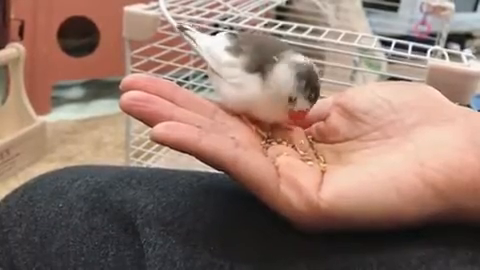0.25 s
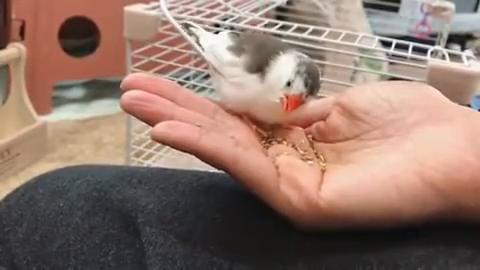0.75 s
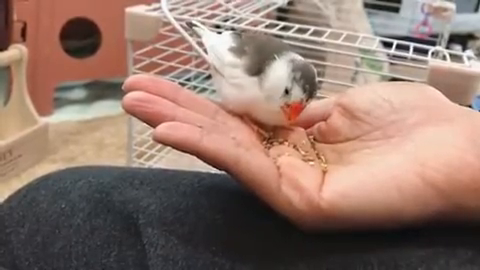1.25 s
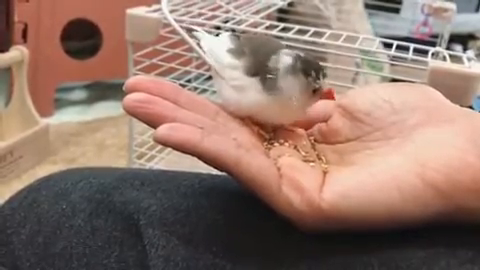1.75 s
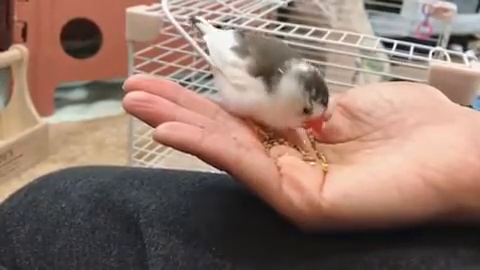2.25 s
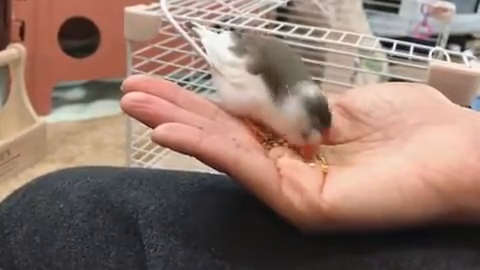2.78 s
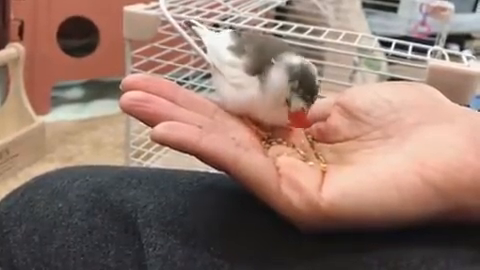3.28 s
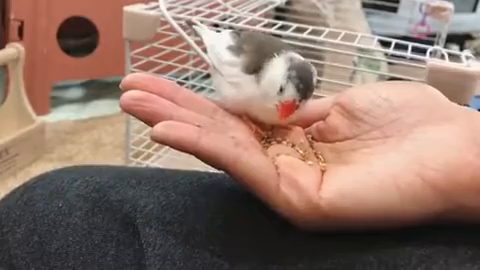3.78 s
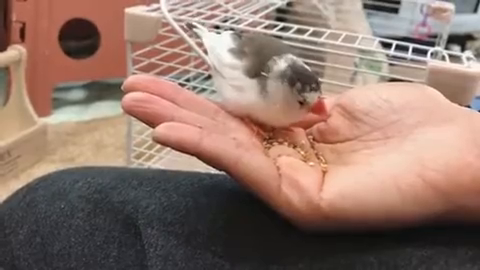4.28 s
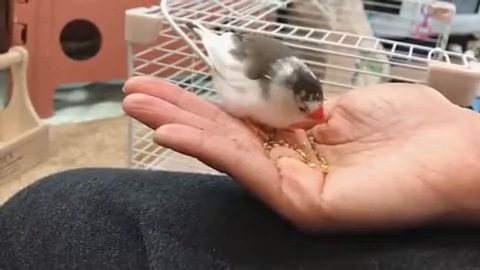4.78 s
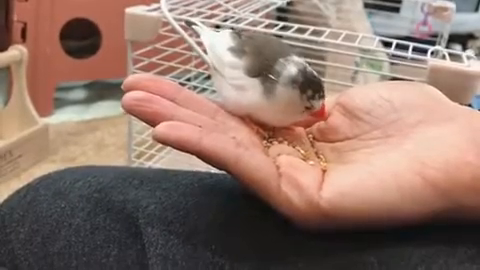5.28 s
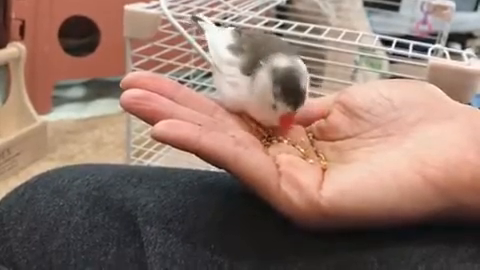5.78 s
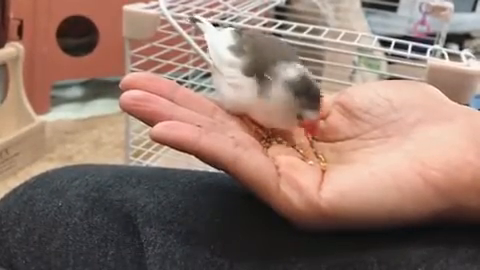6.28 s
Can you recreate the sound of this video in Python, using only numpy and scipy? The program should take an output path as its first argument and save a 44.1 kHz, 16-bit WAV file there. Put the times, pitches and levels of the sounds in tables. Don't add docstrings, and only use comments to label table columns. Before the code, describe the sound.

A quiet indoor room holds a low mains-like hum, soft air noise and a faint, irregular fan rattle throughout. Close to the phone, a small finch feeds with tiny dry rustles and a very soft nasal peep at 0.6 s, followed by a faint husk tick. From 1.3 to 1.95 s a bird across the room gives six sharp gliding chirps, roughly nine per second, each a quick sweep or leap, blurred by wall reflections. One lone chirp comes at 2.7 s. Small rustles continue around 3 s. At 3.7 to 4.0 s there is a tight cluster of chirps, with a faint near peep just before. A crisp husk snap lands at 4.1 s, another at 4.5 s, then more rustling. A barely audible falling chirp passes at 5.1 s, a soft nasal call at 5.65 s, and a low-to-rising chirp with a strong held end at 5.8 s. Rustles and rattle finish by 6.5 s.

```python
import sys
import numpy as np
from scipy import signal
from scipy.fft import rfft, irfft, next_fast_len
from scipy.io import wavfile
from scipy.ndimage import uniform_filter1d

SR = 44100
rng = np.random.default_rng(int(sys.argv[2]) if len(sys.argv) > 2 else 0)


def int16_out(signal):
    q = np.round(np.clip(np.atleast_2d(signal).T, -1, 1) * 32767)
    wavfile.write(sys.argv[1], SR, q.astype(np.int16))


def natural_amplitude(level_db):
    exponent = np.asarray(level_db, float) / 20
    return 10 ** exponent


N = 287973

# freq_hz, density_db
HUM_SPECTRUM = [(20, -31), (45, -1), (70, 2.5), (175, -9.5), (295, -9.5), (450, -15.5), (800, -20),
                (1100, -17.5), (1900, -16), (3000, -24.5), (6000, -29), (7200, -35.5), (11700, -34),
                (14200, -35.5)]
# freq_hz, width_hz, level_db
HOUSING_MODES = [(1068, 71, -6), (1680, 32, 2), (1914, 57, 4), (2206, 6.2, 2), (2576, 37, -2.5),
                 (3190, 124, -9), (3670, 53, -21), (4100, 100, -14.5)]
# start_s, peak_db
FAN_KNOCKS = [(0.024, -49), (0.0638, -51), (0.3067, -53.5), (0.5127, -52.5), (0.9654, -55), (1.021, -49.5),
              (1.172, -48), (2.0771, -51), (2.1912, -50), (2.5253, -53), (2.5914, -56), (2.645, -49),
              (2.7766, -49.5), (3.0044, -51.5), (3.175, -51.5), (3.2101, -49), (3.252, -52.5),
              (3.3772, -59), (3.5543, -49.5), (3.6644, -51.5), (4.249, -49.5), (4.3066, -52.5),
              (4.4027, -54), (4.7604, -50.5), (4.8155, -57), (5.2634, -54), (5.4232, -52.5),
              (5.9468, -48.5), (6.2898, -47.5), (6.327, -47)]
# start_s, peak_db, ring_hz
HUSK_SNAPS = [
    (0.6544, -53, 3200),
    (4.0735, -35, 4700),
    (4.4228, -56, 3420),
    (4.477, -38, 3300),
]
# start_s, peak_db, length_s
RUSTLES = [(0.293, -47.5, 0.012), (0.97, -66, 0.03), (2.19, -64, 0.015), (2.643, -76, 0.02),
           (4.758, -74, 0.017), (1.26, -53.5, 0.06), (2.514, -51, 0.028), (2.982, -48.5, 0.034),
           (3.184, -59.5, 0.13), (3.374, -56, 0.035), (3.557, -59, 0.03), (4.559, -54, 0.065),
           (4.797, -54, 0.031), (4.9, -53.5, 0.066), (5.002, -58, 0.026), (5.328, -56, 0.016),
           (5.424, -58, 0.036), (6.115, -51.5, 0.017), (6.212, -51, 0.031), (6.286, -50.5, 0.032),
           (6.402, -59, 0.021)]
# start_s, length_s, top_pitch_hz, level_db
SOFT_CALLS = [
    (0.581, 0.056, 510, -64),
    (3.656, 0.02, 504, -70.5),
    (5.645, 0.051, 512, -66.5),
]
# freq_hz, gain_db
BEAK_RESPONSE = [(500, -37), (1000, 0), (1500, -4), (2500, -3.5), (3500, 4), (4600, -2), (5200, -9),
                 (6200, -9), (8000, -36)]
# (time_s,
# pitch_hz, level_db)
FAR_CHIRPS = [
    (-9.5, 3.4, [(1.302, 3600, -48), (1.317, 3000, -44.5), (1.319, 4200, -35), (1.327, 3830, -38), (1.332, 4170, -31.5), (1.340, 4900, -31), (1.345, 5800, -42)]),
    (-10.5, 4, [(1.428, 5700, -37), (1.443, 5370, -50), (1.445, 6200, -39.5), (1.450, 5500, -28.5), (1.452, 4490, -26), (1.466, 3960, -37.5), (1.468, 6700, -46), (1.475, 7300, -44)]),
    (-7.5, 3.7, [(1.558, 6100, -69), (1.572, 5700, -40.5), (1.582, 5240, -33), (1.584, 4500, -27), (1.593, 4290, -25.5), (1.596, 6300, -37), (1.602, 7500, -37), (1.605, 7000, -37), (1.610, 6370, -31)]),
              (-6.5, 3.9, [(1.655, 3140, -32), (1.662, 2550, -40.5), (1.668, 2500, -41), (1.670, 3240, -35), (1.678, 3900, -32), (1.680, 4250, -28), (1.688, 4330, -30)]),
    (-4, 3.5, [(1.769, 6270, -61), (1.778, 4510, -28), (1.788, 4224, -19), (1.790, 3610, -32), (1.795, 3260, -35), (1.796, 3970, -29), (1.800, 4800, -28), (1.803, 6530, -43), (1.807, 5800, -38)]),
    (-6, 1.3, [(1.872, 2426, -46.5), (1.881, 2950, -41), (1.883, 6580, -57), (1.888, 5800, -31.5), (1.911, 4760, -29.5), (1.914, 6330, -38), (1.922, 6520, -44), (1.924, 5400, -50), (1.96, 5070, -46)]),
              (-7.5, 1.8, [(3.728, 2646, -38), (3.740, 2575, -43.5), (3.742, 3460, -24), (3.749, 5680, -35), (3.755, 4260, -27), (3.770, 4710, -38.5), (3.782, 4010, -31.5), (3.812, 2994, -40.5), (3.822, 4030, -32)]),
    (-7, 1.4, [(3.891, 3613, -48), (3.904, 3490, -38), (3.912, 4720, -43), (3.920, 4466, -22.5), (3.930, 4785, -24), (3.934, 3305, -42), (3.946, 3840, -27), (3.949, 3097, -44), (3.977, 2730, -37)]),
    (-16, 4, [(3.985, 4260, -22), (3.997, 4810, -30), (4.000, 2784, -41), (4.010, 2800, -54), (4.012, 4020, -34.5), (4.021, 3500, -34)]),
              (-10, 4, [(2.685, 2515, -60), (2.699, 2494, -43), (2.700, 6080, -34), (2.705, 6120, -32), (2.707, 6900, -38), (2.724, 6340, -35), (2.726, 4330, -27), (2.734, 2916, -39.5), (2.742, 4770, -23)]),
    (-33, 4, [(5.1, 3620, -58), (5.107, 2940, -51), (5.114, 2460, -55)]),
    (-9, 1.5, [(5.765, 3700, -44), (5.774, 3890, -49.5), (5.779, 2085, -43.5), (5.788, 2324, -41.5), (5.790, 4350, -35), (5.808, 2890, -37.5), (5.812, 4900, -41), (5.833, 4600, -29)]),
    (-13.5, 19.6, [(5.834, 4560, -27), (5.846, 4493, -22), (5.853, 4660, -41), (5.860, 4563, -20.5), (5.874, 4400, -30), (5.879, 5010, -32), (5.884, 6230, -42), (5.887, 3130, -35), (5.897, 4000, -33.5)]),
]
# freq_hz, t60_s
ROOM_DECAY = [(2000, 0.3), (4500, 0.27), (7000, 0.26), (11000, 0.21)]
# freq_hz, gain_db
FAR_PICKUP = [(1500, -27), (2200, -5), (3000, -8.5), (4500, -8.5), (6500, 0), (7700, -13.5), (9000, -7.5),
              (10400, -16.5), (12000, -9), (14000, -9.5)]


def on_log(freq_hz, table):
    table_hz, value = np.transpose(table)
    return np.interp(np.log(np.maximum(freq_hz, 1)), np.log(table_hz), value)


def colour(x, table):
    size = next_fast_len(len(x))
    freq_hz = np.arange(size // 2 + 1) * SR / size
    return irfft(rfft(x, size) * natural_amplitude(on_log(freq_hz, table)), size)[:len(x)]


def ring(x, freq_hz, width_hz):
    b, a = signal.iirpeak(min(freq_hz, SR / 2.5), freq_hz / width_hz, fs=SR)
    return signal.lfilter(b, a, x)


def walk(rate_hz, size=N):
    hold = max(int(SR / rate_hz), 1)
    steps = rng.standard_normal(size)[np.arange(size) // hold]
    return 1.7 * uniform_filter1d(uniform_filter1d(steps, hold), hold)


def add(out, start_s, sound):
    i = int(start_s * SR)
    out[i:i + len(sound)] += sound[:N - i]


def hum():
    air = colour(rng.standard_normal(N), HUM_SPECTRUM)
    drone = 30 * natural_amplitude(-9.5) * ring(rng.standard_normal(N), 120.7, 8.3)
    level_db = -61 + 0.5 * walk(11)
    return natural_amplitude(level_db) * (air / np.std(air) + drone)


def fan():
    tap_gap_s, tap_db, tap_scatter_db = 0.1, -54.5, 4
    bright_db, bright_scatter_db = 0, 4.5
    luck = rng.standard_normal((int(N / SR / tap_gap_s), 2))
    taps = []
    for k, (shift, force) in enumerate(luck):
        start_s = abs(k + 0.3 * shift) * tap_gap_s
        taps.append((start_s, tap_db + tap_scatter_db * np.tanh(force)))

    dull, bright = np.zeros(N), np.zeros(N)
    t = np.arange(SR // 10) / SR
    for start_s, peak_db in FAN_KNOCKS + taps:
        blow = natural_amplitude(peak_db + 7.5) * rng.standard_normal(len(t)) * np.exp(-t / 0.02)
        add(dull, start_s, blow)
        add(bright, start_s, blow * natural_amplitude(bright_db + bright_scatter_db * rng.standard_normal()))

    patter = natural_amplitude(-60 + 3 * walk(16)) * rng.standard_normal(N)
    out = np.zeros(N)
    for freq_hz, width_hz, level_db in HOUSING_MODES:
        blows = dull if freq_hz < 2400 else bright
        out += natural_amplitude(level_db) * ring(patter + blows, freq_hz, 1.33 * width_hz)
    return out


def feeding():
    out, t = np.zeros(N), np.arange(SR // 8) / SR
    for start_s, peak_db, ring_hz in HUSK_SNAPS:
        tick = rng.standard_normal(len(t)) * np.exp(-t / 0.00052)
        snap = 0.78 * np.diff(tick, prepend=0) + 5.1 * ring(tick, ring_hz, 1300)
        add(out, start_s, natural_amplitude(peak_db - 4.5) * snap)
    for start_s, peak_db, length_s in RUSTLES:
        grain = rng.standard_normal(len(t)) * natural_amplitude(2.0 * walk(900, size=len(t)))
        swell = t / (t + 0.0033) * np.exp(-(t / length_s) ** 2)
        add(out, start_s - 0.003, natural_amplitude(peak_db - 7) * swell * ring(grain, 7360, 7100))
    return out


def soft_calls():
    arch_hz, waver_hz = 16.5, 5
    out = np.zeros(N)
    for start_s, length_s, top_hz, level_db in SOFT_CALLS:
        u = np.arange(int(length_s * SR)) / (length_s * SR)
        arch = np.sin(np.pi * u)
        pitch_hz = top_hz - arch_hz * (1 - arch) + waver_hz * walk(304, size=len(u))
        phase = 2 * np.pi * np.cumsum(pitch_hz) / SR
        buzz = sum(np.sin(k * phase + k * k) for k in range(1, 16))
        add(out, start_s, natural_amplitude(level_db) * arch ** 0.29 * buzz)
    return colour(out * (1 + 0.19 * walk(150)), BEAK_RESPONSE)


def chirps():
    throb, throb_hz, rough, wobble = 0.57, 240, 0.17, 0.0204
    edge_s, breath_db, calm = 0.0047, -24, 0.46
    purer_db_per_db = 0.62
    break_oct_per_s = 82.6

    out, flutter, rasp = np.zeros(N), walk(700), walk(2000)
    breath = np.diff(rng.standard_normal(N + 1))
    beat_hz = throb_hz * (1 + 0.3 * walk(60))
    beat = throb * np.sin(2 * np.pi * np.cumsum(beat_hz) / SR)

    for step_db, third_db, path in FAR_CHIRPS:
        time_s, path_hz, path_db = np.transpose(sorted(path))
        at = np.arange(int(time_s[0] * SR), int(time_s[-1] * SR))
        t = at / SR
        pitch_hz, level_db = np.interp(t, time_s, path_hz), np.interp(t, time_s, path_db)
        glide_oct_per_s = uniform_filter1d(abs(np.gradient(np.log2(pitch_hz))) * SR, size=40)

        unrest = np.clip(0.26 + 0.081 * glide_oct_per_s - (level_db + 39.0) / 12, calm, 1.6)
        pitch_hz = pitch_hz * (1 + unrest * wobble * flutter[at])
        phase = 2 * np.pi * np.cumsum(pitch_hz) / SR

        overtone_db = step_db - purer_db_per_db * (level_db + 37.5)
        tone = 0
        for k in range(4):
            partial_db = k * overtone_db + third_db * (k == 2)
            audible = (k + 1) * pitch_hz < SR / 2.2
            tone = tone + natural_amplitude(partial_db) * np.sin((k + 1) * phase) * audible

        to_edge_s = np.minimum(t - time_s[0], time_s[-1] - t)
        swell = np.sin(np.pi / 2 * np.clip(to_edge_s / edge_s, 0, 1))
        swell = swell / (1 + (glide_oct_per_s / break_oct_per_s) ** 2)
        voice = tone * (1 + unrest * (beat[at] + rough * rasp[at])) + natural_amplitude(breath_db) * breath[at]
        add(out, time_s[0], natural_amplitude(level_db) * swell * voice)
    return out


def room(x, wet_db, early_db, early_s=0.023):
    t = np.arange(SR // 2) / SR
    noise, tail = rng.standard_normal(len(t)), 0
    for centre_hz in 700 * 2 ** np.arange(0, 4.6, 0.5):
        edges_hz = [centre_hz / 2 ** 0.25, min(centre_hz * 2 ** 0.25, SR / 2.1)]
        band = signal.sosfilt(signal.butter(2, edges_hz, "band", fs=SR, output="sos"), noise)
        tail = tail + band * natural_amplitude(-60 * t / on_log(centre_hz, ROOM_DECAY))
    tail *= 1 + natural_amplitude(early_db + 3.6 * walk(2000, size=len(t))) * np.exp(-t / early_s)
    tail /= np.sqrt(np.sum(tail ** 2))
    return x + natural_amplitude(wet_db) * signal.fftconvolve(x, tail)[:N]


def scene():
    near = room(feeding() + soft_calls(), wet_db=-33, early_db=-11)
    far = room(colour(chirps(), FAR_PICKUP), wet_db=9.5, early_db=-9)
    return (hum() + fan() + near + far)[None]


def roll_off(x):
    return signal.sosfilt(signal.butter(12, 14000, fs=SR, output="sos"), x)


def record(dry):
    low_pass = signal.ellip(10, 0.2, 80, 13900, fs=SR, output="sos")
    mix = signal.sosfilt(low_pass, dry)
    return roll_off(mix)


dry = scene()
out = record(dry)
int16_out(out)
```